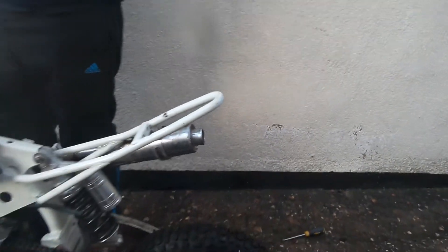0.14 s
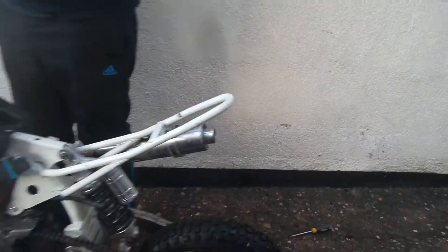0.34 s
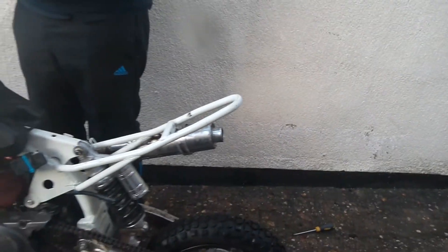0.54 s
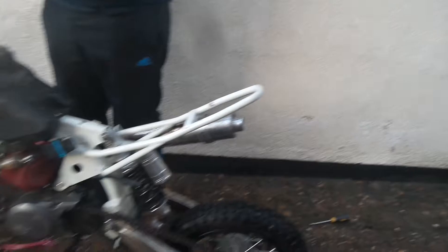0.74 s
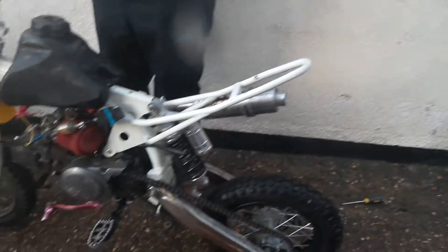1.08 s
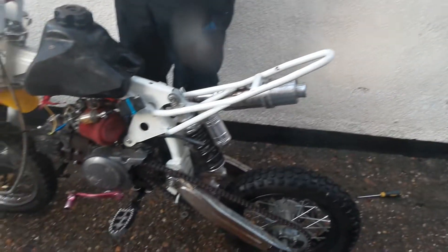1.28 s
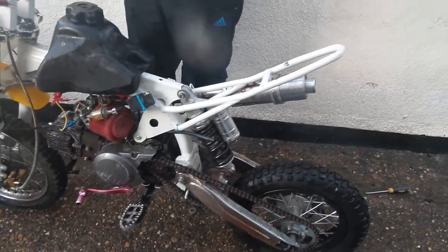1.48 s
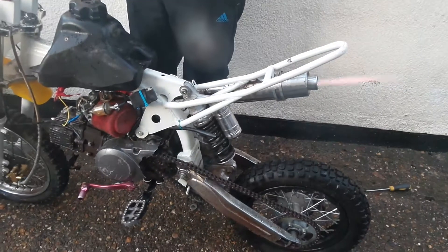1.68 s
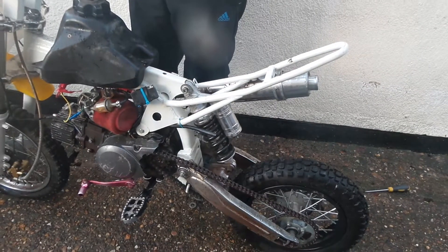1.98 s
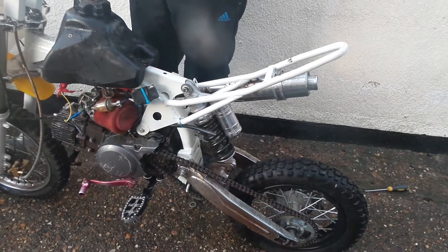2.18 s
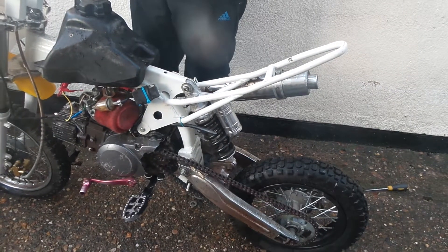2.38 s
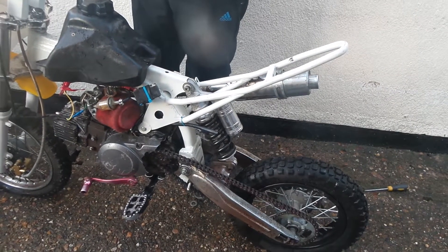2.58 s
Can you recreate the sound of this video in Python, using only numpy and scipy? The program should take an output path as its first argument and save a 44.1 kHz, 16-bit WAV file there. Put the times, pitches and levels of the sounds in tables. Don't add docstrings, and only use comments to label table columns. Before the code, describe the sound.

Close small single-cylinder dirt bike engine: puttering idle, one hard rev, loud exhaust bang, settling down

```python
import sys
import numpy as np
from scipy import signal
from scipy.fft import rfft, irfft, next_fast_len
from scipy.io import wavfile
from scipy.ndimage import uniform_filter1d, map_coordinates

SR = 44100
rng = np.random.default_rng(int(sys.argv[2]) if len(sys.argv) > 2 else 0)


def decibels_to_gain(level_db):
    exponent = np.asarray(level_db, float) / 20
    return 10 ** exponent


def to_wav(s):
    ch = np.atleast_2d(s).T
    pcm = np.round(np.clip(ch, -1, 1) * 32767)
    wavfile.write(sys.argv[1], SR, pcm.astype(np.int16))


N = 120393

# t/s, rattle level/dB, left over right/dB
RATTLE_RIDE = [(0.0, -17, 0.5), (0.04, -17.5, -2.5), (0.55, -21.5, -5), (0.82, -21.5, -6), (0.96, -18, -7),
               (1.16, -9, -4), (1.31, -10, -3.5), (1.49, -8.5, -7), (1.7, -12.5, -4), (1.73, -9, -5),
               (1.82, -13, -5.5), (2.12, -14, -5.5), (2.69, -18, -6), (2.73, -11.5, -6)]
# t/s, throttle/0-1, pipe thump level/dB, low thud level/dB
BURN = [(0, 0.13, -28, -36), (.72, 0.14, -21.5, -37), (.8, 0.27, -25.5, -45), (.9, 0.29, -21, -43),
        (1.02, 0.65, -22.5, -37.5), (1.1, 0.79, -31, -37), (1.32, 1, -45, -76), (1.42, 0.36, -31, -74),
        (1.5, 0, -56, -79), (1.7, 0.1, -43, -67), (1.74, 0, -22, -37), (2.25, 0.12, -21.5, -47.5),
        (2.33, 0, -25.5, -37), (2.6, 0.03, -28.5, -38.5), (2.7, 0.13, -22, -38)]


def unit(x):
    return x / np.sqrt(np.mean(x ** 2) + 1e-20)


def along(points, hz):
    f, v = np.transpose(points)
    return np.interp(np.log(hz + 1), np.log(f + 1), v)


def curves(rows):
    s, *cols = np.transpose(rows)
    return [np.interp(np.arange(N) / SR, s, c) for c in cols]


def wobble(rate):
    return map_coordinates(rng.standard_normal(800), [np.arange(N) * rate / SR])


def filtered(x, response):
    m = next_fast_len(N + SR // 2)
    return irfft(rfft(x, m) * response(np.fft.rfftfreq(m, 1 / SR)), m)[..., :N]


def ringing(x, peaks):
    def response(f):
        total = 0
        for k, (centre, width, db) in enumerate(peaks):
            damping = 1j * f * abs(width)
            total = total + (-1) ** k * decibels_to_gain(db) * damping / (centre * centre - f * f + damping)
        return total
    return filtered(x, response)


def rung_twice(x, peaks):
    return unit(ringing(ringing(x, peaks), peaks))


def rush(spectrum, envelope):
    # f/Hz, left-right correlation/0-1
    likeness = [(60, 0.85), (180, 1), (550, 0.4), (1650, 0.3), (4000, 0.33), (7000, .15), (15000, 0.15)]

    def colour(hz):
        angle = np.arccos(np.clip(along(likeness, hz), -1, 1)) / 2
        return decibels_to_gain(along(spectrum, hz)) * [np.cos(angle), np.sin(angle)]

    pair = rng.standard_normal((2, N))
    scale = np.sqrt(N) / np.linalg.norm(filtered(pair, colour))
    mid, side = filtered(pair * envelope, colour) * scale
    return np.array([mid + side, mid - side])


def firings():
    # t/s, firing rate/Hz
    firing_rate = [(0, 33.76), (.2, 31.57), (.5, 29.08), (.66, 27.14), (.77, 25.4), (.85, 30.74),
                   (.93, 38.74), (1.0, 46.49), (1.1, 55.21), (1.2, 64.4), (1.31, 70.8), (1.4, 68.4),
                   (1.53, 64.4), (1.69, 59.6), (1.75, 58.7), (1.8, 52.49), (1.95, 51.51), (2.15, 46.87),
                   (2.35, 42.46), (2.55, 38.49), (2.73, 38.11)]
    # t/s, loss/dB
    misfires = [(.015, -2), (.106, 7), (.199, -5), (.231, 2), (.295, 4), (.394, 23.5), (.53, 5), (.565, 8),
                (.674, 8), (.711, 8.5), (.75, 0.5), (1.022, -6), (1.331, 15), (1.816, 0), (1.931, 30.5),
                (1.97, 24), (2.03, 11.5), (2.197, 3), (2.241, 5.5), (2.286, 6.5), (2.309, 10), (2.356, 5.5),
                (2.38, -3), (2.404, 2), (2.428, -0.5), (2.453, -1.5), (2.478, 6.5), (2.503, 14), (2.606, 6),
                (2.658, -0.5)]
    first_turn, jitter = .48, .022
    scatter_db, blast_scatter_db = 1.3, 1.5
    misfire_s, silencer_share = .009, .65

    speed, = curves(firing_rate)
    turns = first_turn + np.cumsum(speed) / SR
    chance = np.clip(rng.standard_normal((200, 3)), -1.5, 1.5)
    at = np.interp(np.arange(1, int(turns[-1]) + 1), turns, np.arange(N))
    whole = at.astype(int)
    unsteady = np.clip(1 - 1.6 * curves(BURN)[0][whole], .1, 1)
    at = at + jitter * unsteady * chance[:len(at), 0] * SR / speed[whole]
    at = np.clip(at, 0, N - 2)
    loss_db = sum(db * np.exp(-((at / SR - s) / misfire_s) ** 2) for s, db in misfires)

    def train(db):
        whole, part = at.astype(int), at % 1
        return (np.bincount(whole, decibels_to_gain(db) * (1 - part), N)
                + np.bincount(whole + 1, decibels_to_gain(db) * part, N))

    size_db = scatter_db * chance[:len(at), 1]
    pulses = train(size_db - loss_db)
    puffs = train(size_db - silencer_share * loss_db)
    spits = train(blast_scatter_db * chance[:len(at), 2])
    return pulses, puffs, spits, speed, turns


def pipe_thump(pulses, puffs, speed):
    # f/Hz, width/Hz, level/dB
    pipe_modes = [(199.3, 31, 18.5), (340, 76, -1), (395, 17, 6), (912, 37, 6.5), (1162, 29, 8)]
    silencer_modes = [(523, 66, 0)]
    thud_modes = [(76.5, 33, -3.5), (128.5, 11, -3)]
    silencer_late_s, thump_leads_s = .003, .0025
    throttle, thump_db, thud_db = curves(BURN)

    drive = pulses / np.sqrt(speed)
    wide = [(hz, 2.6 * width, db) for hz, width, db in pipe_modes]
    thump = unit(ringing(ringing(drive, wide), pipe_modes))
    silencer_db = -11 - 6 * throttle - .22 * (speed - speed.min()) + 1.5 * wobble(11)
    silencer = rung_twice(puffs / np.sqrt(speed), silencer_modes) * decibels_to_gain(silencer_db)
    both = thump + np.roll(silencer, int(silencer_late_s * SR))
    early = np.roll(both, -int(thump_leads_s * SR))
    return decibels_to_gain(thump_db) * early + decibels_to_gain(thud_db) * rung_twice(drive, thud_modes)


def metallic(x):
    modes_db = 3.5
    z = signal.stft(x, nperseg=2048)[2]
    field = uniform_filter1d(rng.standard_normal(z.shape[1:]), size=2, axis=0)
    field = uniform_filter1d(field, size=4, axis=1)
    lit_db = modes_db * unit(field) - modes_db ** 2 / 5.25
    return signal.istft(z * decibels_to_gain(lit_db), nperseg=2048)[1][:, :N]


def dying(spits, t60):
    t = np.arange(SR // 10) / SR
    burst = decibels_to_gain(-60 * t / t60) * (1 - np.exp(-t / 0.00038))
    return signal.fftconvolve(spits, burst)[:N]


def rattle(spits, turns):
    # f/Hz, density/dB
    spectrum = [(350, -47), (600, -14), (1450, -20), (2250, -12), (3000, -14.5), (4000, 1.5), (4900, -3.5),
                (6700, -23), (15600, -30.5)]
    clack, clack_late_s, clack_t60_s = 1.8, .011, .035
    clack_at_s, clack_span_s = .85, .12

    loading = np.exp(-((np.arange(N) / SR - clack_at_s) / clack_span_s) ** 2)
    clacks = 1 + clack * loading * np.roll(dying(spits, clack_t60_s), int(clack_late_s * SR))
    beat_db = np.cos(2 * np.pi * (turns - .2))
    uneven_db = 0.23 * wobble(34.56) + 0.37 * wobble(150) + 0.6 * wobble(5.3)
    level_db = curves(RATTLE_RIDE)[0] + 0.2 + beat_db + uneven_db
    return metallic(rush(spectrum, clacks * decibels_to_gain(level_db)))


def blast(spits, speed):
    # f/Hz, density/dB
    spectrum = [(500, -31), (900, -7), (2200, 1.5), (3000, 3.5), (4300, 13.5), (5300, 9.5), (7000, -9),
                (15600, -8)]
    blast_db, blast_t60_s = -7.5, 0.095
    crack, crack_t60_s, crack_at_hz, crack_span_hz = 5.5, .008, 38, 8

    cracking = crack * np.exp(-((speed - crack_at_hz) / crack_span_hz) ** 2)
    gate = dying(spits, blast_t60_s) + cracking * dying(spits, crack_t60_s)
    return decibels_to_gain(blast_db) * rush(spectrum, curves(BURN)[0] * gate)


def bark(pulses, speed):
    # f/Hz, width/Hz, level/dB
    bark_modes = [(286, 139, 1), (518, 89, 4), (745, 140, 0.1), (1360, 1180, -6.5)]
    howl_modes = [(380, 59, -1), (553, 40, -5), (705, 67, 1.3), (887, 140, 0.5), (1250, 1100, -7)]
    bark_db, rough, howl_from_hz, howl_span_hz = -20.5, .2, 60, 8.6

    def raspy(peaks):
        voice = rung_twice(pulses / np.sqrt(speed), peaks)
        return voice + rough * rung_twice(rng.standard_normal(N), peaks)

    fast = np.clip((speed - howl_from_hz) / howl_span_hz, 0, 1)
    voice = (1 - fast) * raspy(bark_modes) + fast * raspy(howl_modes)
    return decibels_to_gain(bark_db) * curves(BURN)[0] * voice


def roar(speed):
    # f/Hz, density/dB
    spectrum = [(15, -63), (25, -31), (198, -6.5), (377, -10.5), (525, -16), (619, -15), (900, -31),
                (1170, -15), (1980, -120)]
    throttle, _, thud_db = curves(BURN)
    level_db = -39 + 0.048 * (thud_db - thud_db.max()) + 20 * throttle + 3 * wobble(33.66)
    return rush(spectrum, decibels_to_gain(level_db))


def singing_plates(speed):
    # f/Hz, width/Hz, level/dB
    plate_modes = [(697, 30, -35), (1619, 26, -26.5), (2360, 18, -30.5), (4060, 16, -19), (4450, 48, -48)]
    db_per_hz = 0.83
    plates = 0
    for hz, width, db in plate_modes:
        plates = plates + decibels_to_gain(db) * rung_twice(rng.standard_normal((2, N)), [(hz, width, 0)])
    return plates * decibels_to_gain(db_per_hz * (speed - speed.max()))


def hum(turns):
    # multiple of the firing rate, level/dB
    harmonics = [(1, -37), (2, -14), (3, 0), (4, -14), (5, -24), (6, -27), (7, -19), (8, -17), (9, -18),
                 (10, -19), (11, -22), (12, -17), (13, -28), (14, -24)]
    # t/s, level/dB, second harmonic boost/dB
    ride = [
        (1.12, -72, -11),
        (1.18, -22, -14),
        (1.31, -18, -18),
        (1.335, -36, 3),
        (1.355, -16.5, -46),
        (1.5, -21.5, 6.7),
        (1.68, -21, 8.5),
        (1.715, -20.5, -3),
        (1.75, -57, 3),
    ]
    waver_db = 1.2
    hum_db, second_db = curves(ride)
    total = 0
    for k, db in harmonics:
        level_db = db + (k == 2) * second_db + waver_db * wobble(12.0)
        total = total + decibels_to_gain(level_db) * np.sqrt(2) * np.sin(2 * np.pi * k * turns + k * k)
    return decibels_to_gain(hum_db) * total


def engine():
    pulses, puffs, spits, speed, turns = firings()
    pipe = pipe_thump(pulses, puffs, speed) + bark(pulses, speed) + hum(turns)
    spread = rattle(spits, turns) + blast(spits, speed) + roar(speed) + singing_plates(speed)
    return pipe, spread


def wall(x):
    # f/Hz, t60/s
    decay = [(100, 0.3), (1000, 0.26), (8000, 0.02)]
    hz, t, z = signal.stft(rng.standard_normal((2, SR // 3)), SR, nperseg=256)
    tail = signal.istft(z * decibels_to_gain(-60 * t / along(decay, hz)[:, None]), SR, nperseg=256)[1]
    tail = tail / np.linalg.norm(tail[0])
    late = np.pad(x, (200, 0))[None]
    return signal.fftconvolve(late, tail, axes=1)[:, :N]


def tick():
    # f/Hz, width/Hz, level/dB
    strike_modes = [(1900, 1000, 0), (3200, 800, -1), (4500, 700, 2)]
    tick_s, tick_db = .3315, 13
    strike = -decibels_to_gain(tick_db) * (np.arange(N) == int(tick_s * SR))
    return ringing(strike, strike_modes)


def pops():
    # t/s, level/dB, rise/s, t60/s
    events = [
        (0.333, -19, 0.00067, 0.03),
        (1.321, -5.5, 0.0014, 0.077),
        (1.714, -7, 0.0008, 0.11),
        (1.724, -3, 0.0031, 0.33),
        (1.74, -6, 0.0011, 0.026),
        (1.772, -22, 0.0029, 0.13),
        (2.721, -8, 0.0013, 0.02),
    ]
    # f/Hz, density/dB
    spectrum = [(35, -17), (90, 3), (350, 8.5), (1500, -7.5), (2800, 3), (4900, 15), (7000, -2.5),
                (15600, -8.5)]
    shape = 0
    for start, db, rise, t60 in events:
        age = np.clip(np.arange(N) / SR - start, 0, 1)
        shape = shape + decibels_to_gain(db - 60 * age / t60) * (1 - np.exp(-age / rise))
    return rush(spectrum, shape * decibels_to_gain(2.1 * wobble(190)))


def scene():
    # f/Hz, share of the pan
    pan_share = [(100, 0), (600, .1), (1400, .55), (3000, 1.5), (5000, 1.1), (9000, .5), (13000, 1.7)]
    # t/s, lag/s
    ear_lag = [(0, -60e-6), (.6, -50e-6), (.8, 50e-6), (2.73, 50e-6)]
    wall_db = -16

    pipe, spread = engine()
    near = pipe + decibels_to_gain(wall_db) * wall(pipe) + spread + pops() + tick()
    hz, t, z = signal.stft(near, SR, nperseg=512)
    turn = 1j * np.pi * hz[:, None] * np.interp(t, *np.transpose(ear_lag))
    s, _, pan_db = np.transpose(RATTLE_RIDE)
    lean_db = along(pan_share, hz)[:, None] * np.interp(t, s, pan_db) / 2
    turned = z * decibels_to_gain([lean_db, -lean_db]) * np.exp([-turn, turn])
    return signal.istft(turned, SR, nperseg=512)[1][:, :N]


def low_pass(x):
    return signal.sosfilt(signal.butter(12, 15680, fs=SR, output="sos"), x)


def record(dry):
    top_hz, clip = 15690, .995
    banded = filtered(dry, lambda hz: hz < top_hz)
    return low_pass(np.clip(banded, -clip, clip))


dry = scene()
out = record(dry)
to_wav(out)
```